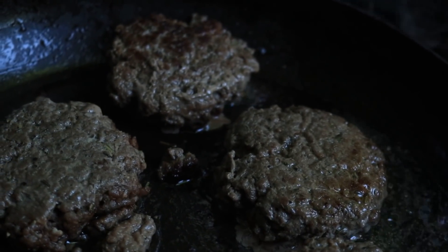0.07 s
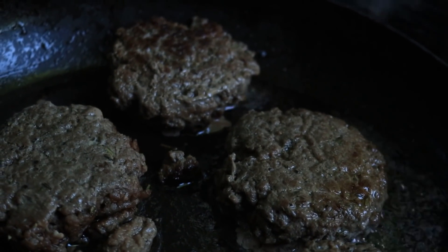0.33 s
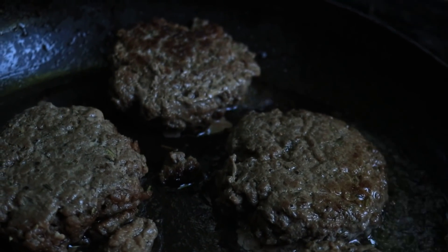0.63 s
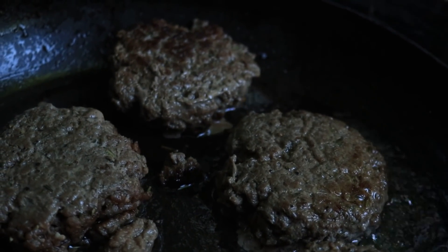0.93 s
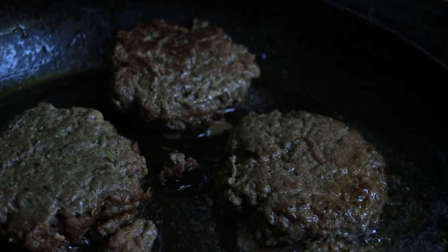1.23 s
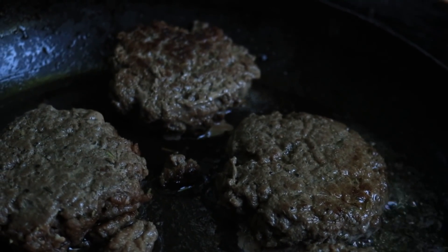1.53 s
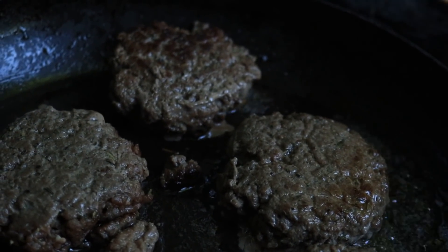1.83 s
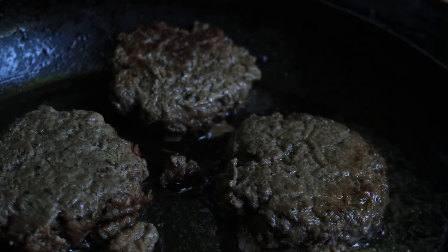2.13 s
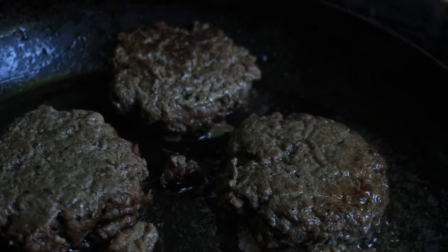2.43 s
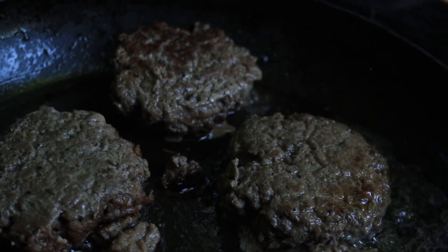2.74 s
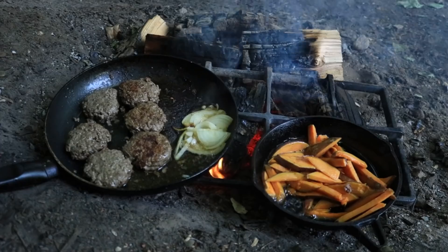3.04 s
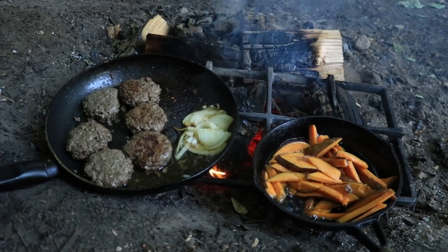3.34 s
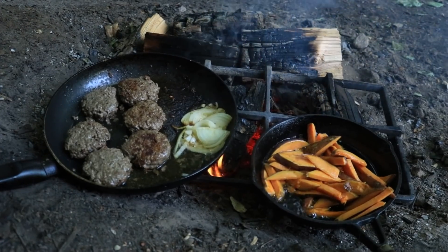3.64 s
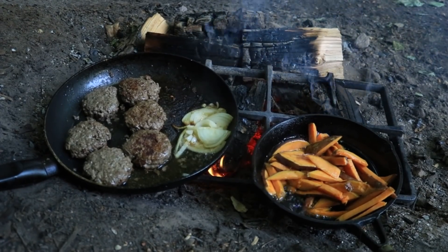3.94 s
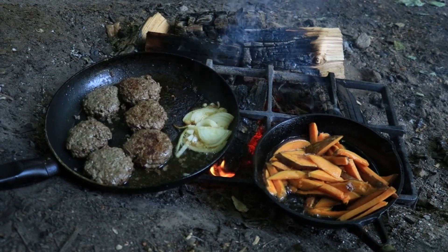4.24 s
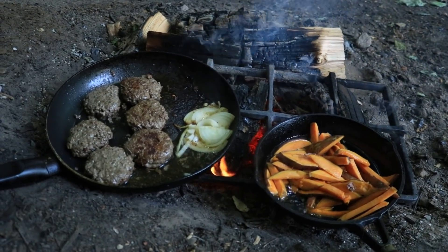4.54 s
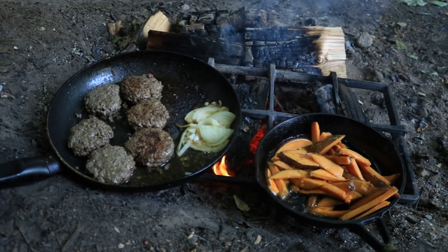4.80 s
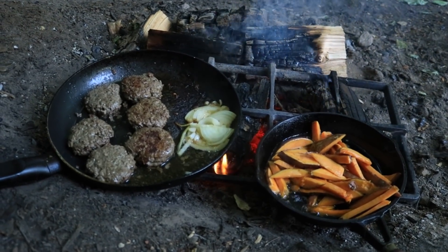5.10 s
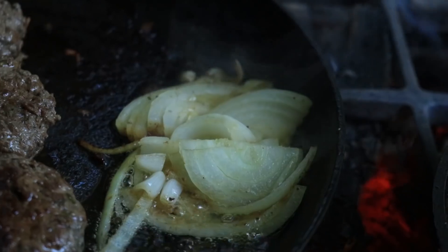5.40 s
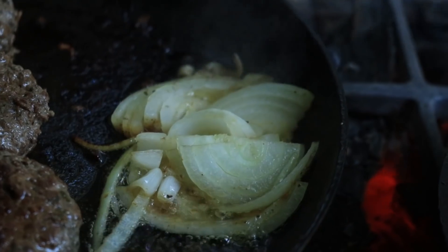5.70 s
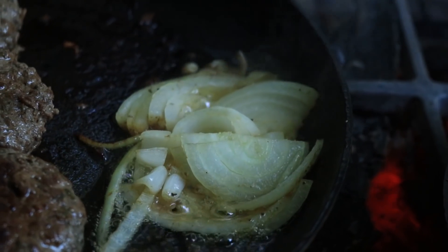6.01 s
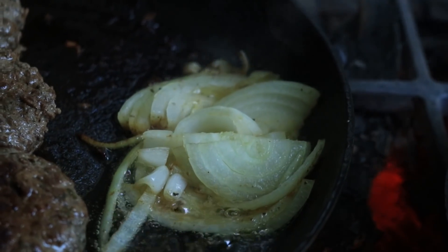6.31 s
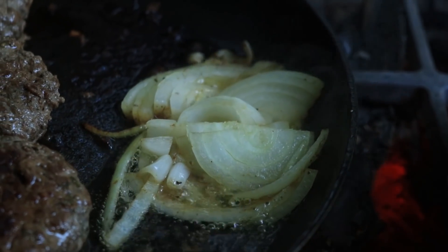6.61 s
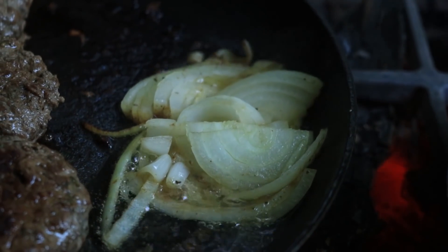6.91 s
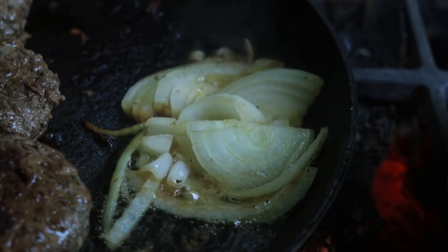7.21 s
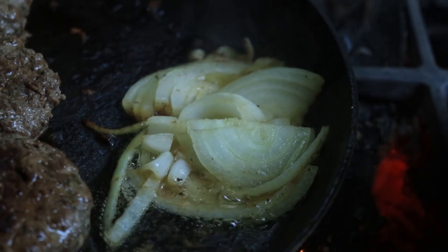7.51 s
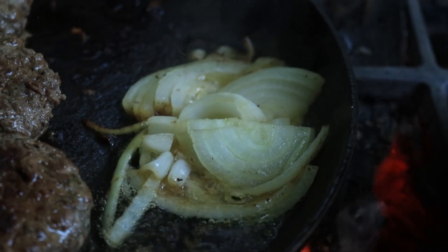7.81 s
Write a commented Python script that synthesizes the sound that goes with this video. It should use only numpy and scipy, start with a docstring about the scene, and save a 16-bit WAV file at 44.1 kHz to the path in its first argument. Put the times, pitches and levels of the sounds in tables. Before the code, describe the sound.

A dense, continuous sizzle of frying comes from a skillet on an outdoor fire, in three stretches. First the microphone is close to burger patties, where bubbles plop and droplets snap in the fat, mostly on the right. Next it is further back from two pans, and the frying is quieter and more even. Last it is over onions, hissing brightly. Faint flame rumble and a few dull puffs sit below.

```python
"""A dense sizzle with single plops and snaps, over a low rumble and dull puffs.
Burger patties and onions fry in an iron skillet over a campfire, heard from three places in turn:
close to the meat, back from both pans, over the onions. Steam bubbles burst in the fat (low, ringing).
Water droplets flash on the iron (high, dry). The largest of each are the plops and snaps."""
import sys
import numpy as np
from scipy import signal
from scipy.fft import rfft, irfft, next_fast_len
from scipy.io import wavfile

SR = 44100
rng = np.random.default_rng(int(sys.argv[2]) if len(sys.argv) > 2 else 0)


def to_wav(sig):
    """Store sig (one row per channel, or 1-D mono) as 16-bit WAV at the path in sys.argv[1].

    Samples outside -1..1 are clipped; the rate is SR.
    """
    pcm = np.clip(np.atleast_2d(sig), -1, 1) * 32767
    pcm = np.round(pcm).astype(np.int16)
    wavfile.write(sys.argv[1], SR, pcm.T)  # frames by channels


N = 350595

# Listening places: meat, both pans, onions. Each row: start in seconds, end in seconds.
PLACE_SPANS_S = [(0, 3.037), (3.037, 5.362), (5.376, 7.96)]
# Puffs of steam and flame. Each row: start in seconds, relative level in dB, band centre in Hz, decay in ms.
PUFFS = [(0.388, -32, 350, 1.9), (0.969, -36, 350, 2), (1.000, -32, 450, 1.5), (1.232, -26.5, 700, 2.8),
         (1.601, -30, 1200, 0.6), (1.620, -27, 328, 2.8), (1.7255, -22.5, 1380, 0.4),
         (1.787, -34, 200, 4.6), (2.389, -25, 1500, 0.6), (2.4157, -27, 1100, 0.5),
         (2.812, -23.5, 950, 0.8), (2.995, -27, 1300, 0.6), (3.346, -38, 500, 9.8), (4.315, -31, 500, 1.7),
         (5.227, -42, 270, 6.4), (5.511, -30, 350, 15)]
# Frying spectrum per place. Each row: frequency in Hz, relative density in dB.
MEAT_COLOUR_DB = [(30, -16.5), (60, -18), (220, -17.5), (450, -18), (680, -10.5), (900, -10), (1500, -4),
                  (2450, -0.5), (3300, -3), (4900, -6), (6500, 5), (8500, 4), (12000, -1.5), (15700, -9)]
PANS_COLOUR_DB = [(30, -10.5), (70, -11.5), (200, -8), (430, -9), (530, -2.5), (700, -7), (1100, -2),
                  (1900, -3), (3100, 2.5), (4000, -0.5), (4900, -9.5), (7200, -1.7), (10000, -2),
                  (15700, -13)]
ONIONS_COLOUR_DB = [(30, -15), (60, -16.5), (160, -11), (450, -11.5), (550, -7), (720, -8), (1200, -6),
                    (1900, -6), (3000, -1.2), (4900, -5), (7300, 5), (9200, 7), (12000, 0.5), (15700, -7)]
# Pan-wall echoes favour one ear. Each row: frequency in Hz, left over right in dB.
MEAT_SIDE_DB = [(100, -0.0), (1100, -1), (1400, -6), (1750, -1.5), (2050, -13), (2550, -8), (3300, -4.8),
                (5000, -4), (6300, -6), (9300, -4.5), (12500, -10)]
PANS_SIDE_DB = [(300, -0.5), (1000, -2), (1800, -1.5), (2250, -7.2), (3200, -1.0), (4800, -1.5),
                (6000, -5.3), (7500, -6), (9000, -2.4), (10700, -4), (13000, -0.5)]
ONIONS_SIDE_DB = [(100, 0), (1050, 0.5), (1900, -2), (2300, -6), (3300, -0.5), (4300, -1.5), (5800, -5.1),
                  (7500, -3.5), (9000, 0), (15000, 0)]
# Simmer, drifting with the heat. Each row: time in seconds, bubbling gain in dB, fizz gain in dB.
MEAT_SIMMER_DB = [(0, -29.5, -33), (0.55, -30.5, -35), (0.66, -31, -35.5), (0.8, -30.5, -32.5),
                  (1.7, -30.5, -34.5), (3.03, -30.5, -32)]
PANS_SIMMER_DB = [(3.04, -42.5, -37.5), (3.15, -37.9, -34), (3.42, -41.5, -37), (4.5, -40, -35.3),
                  (5.26, -39, -35), (5.35, -42, -40)]
ONIONS_SIMMER_DB = [(5.38, -35.5, -30.5), (5.7, -36, -31.5), (6.85, -34.5, -30.5), (7.03, -37, -30.5),
                    (7.4, -34.5, -29.5), (7.94, -36.5, -30.6)]
# Juice runs onto hot iron. Each row: start in seconds, hold in seconds, extra bubbling in dB,
# extra fizz in dB.
JUICE_SPURTS = [(0.538, 0.022, 2.4, 3.5), (0.979, 0.033, 1, 3), (1.198, .045, 3, 2.5), (1.516, 0.14, 2, 1),
                (1.87, 0.027, 3, 3.5), (2.142, 0.1, 0.5, 1.5), (2.3, .02, 0.5, 5.5), (2.385, .03, 0.5, 2.5),
                (2.527, 0.026, 1, -1), (2.866, .02, 1.5, 4.5), (2.967, .03, 0.5, 0),
                (3.337, 0.038, 2.3, 1.5), (3.46, .15, 3.2, 3.5), (3.657, .045, 2, 3.5),
                (3.816, 0.049, 3, 1), (4.056, 0.033, 4, 0.7), (4.298, 0.016, 4.5, 4),
                (4.412, .02, 2.4, 4.5), (4.565, .06, 0.7, 1.5), (4.727, 0.069, 0.5, 3),
                (4.829, .04, 1.5, 3.5), (4.994, 0.1, 0, 3.5), (5.21, 0.041, 1, 5), (5.374, 0.03, 3, 1.5),
                (5.511, .02, 3, 4.5), (6.217, 0.027, 2.5, 0.5), (6.491, .02, 0.5, 5),
                (6.743, 0.052, 1.5, 3), (6.895, .02, 2.2, 2), (7.131, 0.094, 2.5, 3), (7.57, 0.046, 1, 2.5),
                (7.857, .03, 1, 3)]
# Large steam bubbles and exploding droplets. Each row: start in seconds, relative level in dB,
# pitch in Hz, ring decay in ms, left over right in dB.
BUBBLE_PLOPS = [(0.0705, -20, 2850, 0.8, -7), (0.1235, -22, 2640, 1.0, -9), (0.2582, -17.5, 2800, 0.22, -9),
                (0.3895, -20, 2520, 0.16, -4), (0.4875, -17, 2270, 0.62, -17), (0.5495, -20, 2060, 0.7, -9),
                (1.0653, -16, 2450, 2.3, -10), (1.212, -15, 2620, 1.0, -11), (1.2356, -15, 2260, 0.56, -10),
                (1.2455, -13.5, 2200, 0.63, -8), (1.3552, -19, 2400, 0.9, -13),
                (1.3632, -15, 2330, 0.89, -11), (1.4574, -12.5, 2620, 1.4, -9),
                (1.5206, -12, 2540, 1.5, -15), (1.5309, -18, 2340, 1.1, -16),
                (1.5386, -8.5, 2680, 0.98, -9), (1.5924, -18, 2170, 0.41, -8),
                (1.6012, -18.5, 1980, 0.56, -5), (1.7257, -19.5, 2240, 0.13, -10),
                (1.7791, -10, 2660, 1, -9), (1.8764, -7.5, 2700, 0.6, -8), (2.1049, -13, 2520, 0.18, -7),
                (2.1553, -16, 1900, 0.48, -14), (2.4157, -15, 3070, 0.11, -3),
                (2.5493, -17, 2230, 0.47, -10), (2.554, -13, 2480, 1.1, -16), (2.6503, -18, 2320, 1.2, -10),
                (2.7691, -19, 2310, 0.35, -10), (2.79, -20, 2780, 0.74, -17), (2.8124, -19, 1490, 0.84, -4),
                (2.8673, -17.5, 2380, 0.64, -12), (2.9845, -14.5, 3100, 0.87, -13),
                (2.9954, -13.5, 2260, 0.62, -11), (3.2241, -18.5, 3340, 0.56, -2)]
DROPLET_SNAPS = [(0.993, -19, 10710, 0.33, -13), (1.0072, -9.5, 8800, 0.18, 0),
                 (1.1061, -11.5, 8100, 0.16, -10), (1.2266, -20.5, 11400, 0.2, -6),
                 (1.8957, -13.5, 7650, 0.25, -14), (1.9038, -19, 10240, 0.13, -19),
                 (2.1498, -18.5, 8200, 0.15, -5), (2.2537, -15.5, 8100, 0.16, -10),
                 (2.2563, -12, 10070, 0.13, -12), (2.3486, -11, 7700, 0.46, -19),
                 (2.3895, -17, 7910, 0.18, -5), (2.416, -13.5, 7840, 0.21, -6),
                 (2.4484, -18, 7950, 0.46, -10), (2.5732, -16, 6800, 0.36, -18),
                 (2.5921, -13.5, 8400, 0.55, -15), (2.6506, -25, 11800, 0.14, -5),
                 (2.8871, -15, 8450, 0.22, -16), (3.1323, -22, 7220, 0.2, -6),
                 (3.5818, -20, 9000, 0.21, -3), (3.9157, -23, 7210, 0.44, -13),
                 (4.3155, -15, 9000, 0.14, -5), (4.4311, -22, 8860, 0.24, -5),
                 (4.483, -19.5, 10200, 0.15, -8), (5.0746, -14.5, 7500, 0.4, -9),
                 (6.2404, -18, 9400, 0.17, 1), (6.9148, -14.5, 8530, 0.13, -3),
                 (7.1519, -18, 9360, 0.24, 5)]

FIRE_TOP_HZ, BUBBLE_REF_HZ, FIZZ_FROM_HZ, EDGE_HZ = 350, 1000, 4700, 15900
BUBBLE_BAND_HZ, BEAD_BAND_HZ, DROPLET_BAND_HZ = (400, 5000), (2000, 3200), (4500, 16000)
IRON_HZ, IRON_HALF_WIDTH_HZ = 542, 15
SPURT_ATTACK_S, SPURT_RELEASE_S = 0.01, 0.017
TEAR_DB_PER_DOUBLING = -4  # a long ring means a gentle tear: less crack and push
MS = 1e-3
AGE_S = np.arange(2048) / SR


def gain_of(db):
    """Decibels to amplitude."""
    return 10 ** (np.asarray(db) / 20)


def unit_rms(x):
    """Scales to rms 1."""
    return x / np.sqrt(np.mean(x ** 2) + 1e-20)


def unit_energy(x):
    """Scales each channel to energy 1."""
    return x / np.sqrt(np.sum(x ** 2, axis=-1, keepdims=True) + 1e-20)


def curve_at(points, hz):
    """Joins (Hz, value) points on a log-frequency axis."""
    point_hz, value = np.transpose(points)
    return np.interp(np.log(hz + 1), np.log(point_hz), value)


def below(hz, edge_hz, order):
    """Power response of a low-pass."""
    return 1 / (1 + (hz / edge_hz) ** order)


def ears(side_db):
    """Left and right gains of mean power 1."""
    ratio = np.atleast_1d(gain_of(side_db))
    return np.array([ratio, np.ones_like(ratio)]) * np.sqrt(2 / (1 + ratio ** 2))


def add(mix, start_s, sound):
    """Mixes in a stereo sound."""
    part = mix[:, max(0, round(start_s * SR)):][:, :sound.shape[1]]
    part += sound[:, :part.shape[1]]


def wander(n, slow_hz, fast_hz):
    """Random drift of rms 1 between two rates."""
    hz = np.fft.rfftfreq(n, 1 / SR)
    band = below(hz, fast_hz, order=4) * (1 - below(hz, slow_hz, order=4))
    return unit_rms(irfft(rfft(rng.standard_normal(n)) * band, n))


def stereo_noise(n, correlation):
    """White noise with a set correlation between the ears."""
    left, other = rfft(rng.standard_normal((2, n)))
    right = correlation * left + np.sqrt(1 - correlation ** 2) * other
    return irfft(np.array([left, right]), n)


def campfire(n, response, correlation):
    """Flickering flames: low noise gathered round one deep note."""
    hz = np.fft.rfftfreq(n, 1 / SR)
    low_band = np.sqrt(below(hz, FIRE_TOP_HZ, order=4))
    deep_note = 1 + 1 / (1 + ((hz - 52) / 10) ** 2)
    rumble = irfft(rfft(stereo_noise(n, correlation)) * low_band * deep_note * response, n)
    flicker_db = 2.4 * wander(n, 0.8, 9.9)
    return unit_rms(rumble * gain_of(flicker_db))


def puffs(gain_db):
    """Gusts of steam and flame: short, dull noise, alike at both ears."""
    out = np.zeros((2, N))
    for start_s, db, hz, decay_ms in PUFFS:
        gust = rng.standard_normal(len(AGE_S)) * np.exp(-AGE_S / (decay_ms * MS))
        band = signal.butter(2, [hz / 2, hz * 2], "band", fs=SR, output="sos")
        puff = unit_energy(signal.sosfilt(band, gust)) * ears(0)
        add(out, start_s, gain_of(db + gain_db) * np.sqrt(SR * MS) * puff)
    return out


def burst(hz, ring_ms, opening, glide, lag_ms):
    """A bursting cavity swells for a share of its ring and dies, pitch rising; one ear hears it first."""
    t = np.maximum(AGE_S - np.maximum([[lag_ms], [-lag_ms]], 0) * MS, 0)
    life = t / (max(ring_ms, 0.03) * MS)
    pitch_hz = hz * (1 + glide * (np.tanh(life) - 0.5))
    turns = np.cumsum(pitch_hz * (t > 0), axis=1) / SR
    envelope = np.exp(-life) * (1 - np.exp(-(life / opening) ** 2))
    return unit_energy(np.sin(2 * np.pi * turns) * envelope)


def pan_echo(sound, echo_db, echo_ms):
    """Adds the quick scatter between pan floor and wall, different at each ear."""
    scatter = rng.standard_normal((2, len(AGE_S))) * np.exp(-AGE_S / (echo_ms * MS)) * (AGE_S > 0.5 * MS)
    echo = unit_energy(signal.fftconvolve(sound, scatter, axes=1)[:, :len(AGE_S)])
    return unit_energy(sound + gain_of(echo_db) * echo)


def swarm(surge, band_hz, lag_ms, per_s, spread_db, cycles, opening, echo_db, spots=48):
    """Spots in the pan, each with its own pitch and place, burst at random: most faintly, a few loudly."""
    n = len(surge)
    out = np.zeros((2, n))
    for hz in np.linspace(*band_hz, spots):
        ring_ms = cycles * np.exp(0.47 * rng.standard_normal()) / hz / MS
        spot = burst(hz, ring_ms, opening, glide=0.13, lag_ms=rng.laplace() * lag_ms)
        spot = pan_echo(spot, echo_db, echo_ms=7.8) * ears(3 * rng.standard_normal())
        when, size, sign = rng.random((3, 1000))
        active = np.arange(len(when)) < per_s * n / SR / spots
        size_db = spread_db * np.minimum(-np.log(size), 5)
        train = np.bincount((when * n).astype(int), gain_of(size_db) * np.sign(sign - 0.5) * active, n)
        out += signal.oaconvolve((train * surge)[None], spot, axes=1)[:, :n]
    return unit_rms(out)


def bubbling_fat(surge, wash, colour, spread_db, bead_db, iron_db, lag_ms):
    """Spectrum of steam bubbles and longer-ringing beads of fat; the bursts keep the iron ringing."""
    n = len(surge)
    hz = np.fft.rfftfreq(n, 1 / SR)
    bubbles = swarm(surge, BUBBLE_BAND_HZ, lag_ms, per_s=2500, spread_db=spread_db,
                    cycles=0.79, opening=0.97, echo_db=-6.5)
    beads = swarm(surge, BEAD_BAND_HZ, lag_ms, per_s=130, spread_db=2,
                  cycles=3.8, opening=0.67, echo_db=-3.5)
    fat = rfft(bubbles + gain_of(bead_db) * beads + wash * np.sqrt(surge))
    fat *= colour * np.sqrt(below(hz, FIZZ_FROM_HZ, order=16))
    fat *= 1 + gain_of(iron_db) / (1 + ((hz - IRON_HZ) / IRON_HALF_WIDTH_HZ) ** 2)
    above_fire = np.sqrt(1 - below(hz, FIRE_TOP_HZ, order=4))
    return fat * above_fire / np.std(irfft(fat * (hz > BUBBLE_REF_HZ), n))


def droplet_fizz(surge, hiss, colour, spread_db, lag_ms):
    """Spectrum of droplets and fine spray flashing on the iron."""
    n = len(surge)
    hz = np.fft.rfftfreq(n, 1 / SR)
    droplets = swarm(surge, DROPLET_BAND_HZ, lag_ms, per_s=4000, spread_db=spread_db,
                     cycles=1.36, opening=0.46, echo_db=-6)
    spray = swarm(surge, DROPLET_BAND_HZ, lag_ms, per_s=2600, spread_db=4,
                  cycles=12.9, opening=0.45, echo_db=8.5)
    fizz = rfft(droplets + gain_of(-4) * spray + hiss)
    fizz *= colour * np.sqrt(1 - below(hz, FIZZ_FROM_HZ, order=16))
    return fizz / np.std(irfft(fizz * (hz < EDGE_HZ), n))


def boil_db(t, simmer):
    """Bubbling and fizz gains: the simmer plus a flare at each spurt of juice."""
    times_s, *drifts_db = np.transpose(simmer)
    gains_db = np.array([np.interp(t, times_s, drift) for drift in drifts_db])
    for start_s, hold_s, *extra_db in JUICE_SPURTS:
        attack = np.clip((t - start_s) / SPURT_ATTACK_S, 0, 1)
        release = np.exp(-np.maximum(t - start_s - hold_s, 0) / SPURT_RELEASE_S)
        gains_db += np.outer(extra_db, attack * release)
    return gains_db


def frying(span_s, simmer, colour_db, side_db, fire_db, fire_correlation, bubble_spread_db,
           fizz_spread_db, bead_db, wash_db, hiss_db, flurry_db, iron_db, lag_ms, left_delay_ms):
    """The pan from one place: near bursts over a wash of countless faint ones, the fire below."""
    t = np.arange(*span_s, 1 / SR)
    n = next_fast_len(len(t))
    hz = np.fft.rfftfreq(n, 1 / SR)
    colour = gain_of(curve_at(colour_db, hz))
    delay_s = MS * np.array([[left_delay_ms], [0]])
    to_ears = ears(curve_at(side_db, hz)) * np.exp(-2j * np.pi * hz * delay_s)
    flurry = wander(n, 6.3, 31)  # bursts clump as steam finds a way out
    fat_surge = gain_of(flurry_db * (flurry + wander(n, 2.5, 45)))
    fizz_surge = gain_of(flurry_db * (1.64 * flurry + 1.14 * wander(n, 7, 60)))
    wash = stereo_noise(n, 0.78 / (1 + (2 * np.pi * hz * lag_ms * MS) ** 2))  # short waves agree less
    fat = bubbling_fat(fat_surge, gain_of(wash_db) * wash, colour, bubble_spread_db,
                       bead_db, iron_db, lag_ms)
    fizz = droplet_fizz(fizz_surge, gain_of(hiss_db) * wash, colour, fizz_spread_db, lag_ms)
    fat, fizz = (irfft(spectrum * to_ears, n)[:, :len(t)] for spectrum in (fat, fizz))
    fire = campfire(n, colour * to_ears, fire_correlation)[:, :len(t)]
    fat_gain, fizz_gain = gain_of(boil_db(t, simmer))
    return gain_of(fire_db) * fire + fat_gain * fat + fizz_gain * fizz


def pops(rows, gain_db, push_db, push_ms, crack_db, crack_ms, opening, glide, echo_db, echo_ms,
         low_cut_ratio, usual_ring_ms):
    """Single large bursts: film crack, ring, pan scatter and a low push of released steam."""
    out = np.zeros((2, N))
    push_age = AGE_S / (push_ms * MS)
    push = unit_energy((1 - push_age) * np.exp(-push_age))
    film_band = signal.butter(1, [2500, 11000], "band", fs=SR, output="sos")
    for start_s, db, hz, ring_ms, side_db in rows:
        rupture = rng.standard_normal(len(AGE_S)) * np.exp(-AGE_S / (crack_ms * MS))
        crack = unit_energy(signal.sosfilt(film_band, rupture))
        # a small source sheds little sound below its pitch
        radiation = signal.butter(3, hz * low_cut_ratio, "high", fs=SR, output="sos")
        ring = unit_energy(signal.sosfilt(radiation, burst(hz, ring_ms, opening, glide, lag_ms=0.09)))
        tear = gain_of(TEAR_DB_PER_DOUBLING * np.log2(ring_ms / usual_ring_ms))
        pop = pan_echo(ring + tear * gain_of(crack_db) * crack, echo_db, echo_ms) * ears(side_db)
        pop += tear * gain_of(push_db) * push
        add(out, start_s, gain_of(db + gain_db) * np.sqrt(SR * MS) * pop)
    return out


def scene():
    """Puffs, the sizzle from three places in turn, and the large bursts on top."""
    meat = frying(PLACE_SPANS_S[0], MEAT_SIMMER_DB, MEAT_COLOUR_DB, MEAT_SIDE_DB, fire_db=-47.5,
                  fire_correlation=0.73, bubble_spread_db=3, fizz_spread_db=4.5, bead_db=-3.5,
                  wash_db=0.5, hiss_db=-1, flurry_db=0.62, iron_db=-25, lag_ms=0.11, left_delay_ms=0.071)
    pans = frying(PLACE_SPANS_S[1], PANS_SIMMER_DB, PANS_COLOUR_DB, PANS_SIDE_DB, fire_db=-56.5,
                  fire_correlation=0.25, bubble_spread_db=2, fizz_spread_db=3.5, bead_db=-5,
                  wash_db=7, hiss_db=-3.5, flurry_db=0.9, iron_db=-7, lag_ms=0.054, left_delay_ms=0)
    onions = frying(PLACE_SPANS_S[2], ONIONS_SIMMER_DB, ONIONS_COLOUR_DB, ONIONS_SIDE_DB, fire_db=-55.5,
                    fire_correlation=0.39, bubble_spread_db=1.5, fizz_spread_db=3, bead_db=-8.5,
                    wash_db=4, hiss_db=-1, flurry_db=0.88, iron_db=-7, lag_ms=0.055, left_delay_ms=-0.02)
    out = puffs(gain_db=2)
    for (start_s, _), sizzle in zip(PLACE_SPANS_S, (meat, pans, onions)):
        add(out, start_s, sizzle)
    out += pops(BUBBLE_PLOPS, gain_db=1.5, push_db=-27, push_ms=0.081, crack_db=-19, crack_ms=0.5,
                opening=0.53, glide=0.026, echo_db=-7.5, echo_ms=14, low_cut_ratio=0.54, usual_ring_ms=0.6)
    out += pops(DROPLET_SNAPS, gain_db=2, push_db=-23, push_ms=0.17, crack_db=-6, crack_ms=0.43,
                opening=0.26, glide=0.041, echo_db=-8, echo_ms=1, low_cut_ratio=0.66, usual_ring_ms=0.2)
    return out


def record(dry):
    """Microphone bass roll-off, full-scale clip, band limit."""
    thinned = signal.sosfilt(signal.butter(2, 34, "high", fs=SR, output="sos"), dry)
    low_pass = signal.firwin(511, EDGE_HZ, window=("kaiser", 9), fs=SR)
    return signal.oaconvolve(np.clip(thinned, -1, 1), low_pass[None], "same", axes=1)


dry = scene()
out = record(dry)
to_wav(out)
```